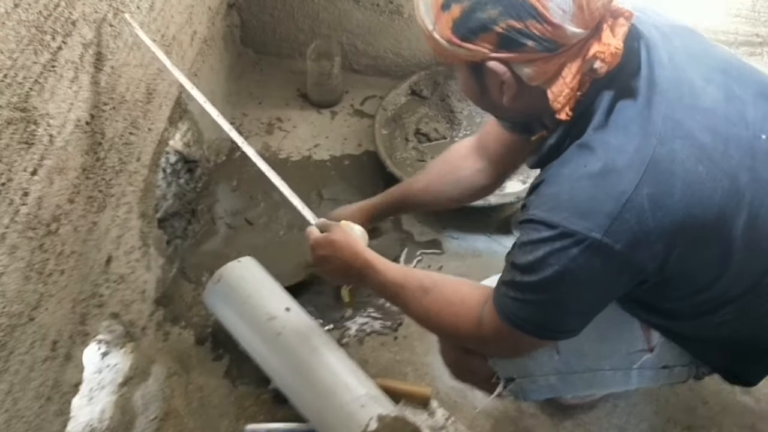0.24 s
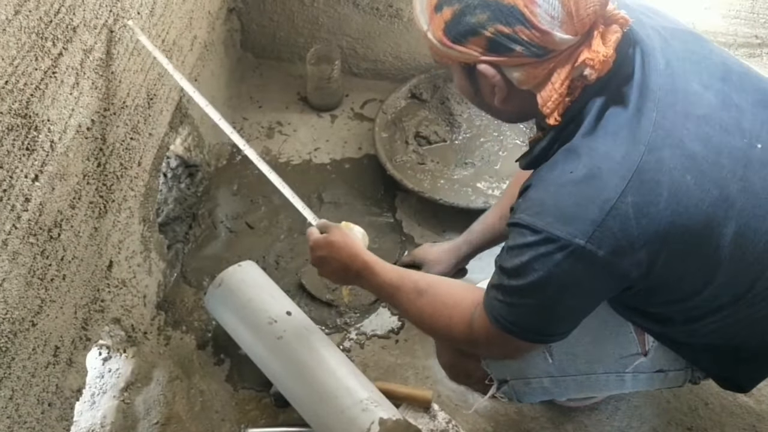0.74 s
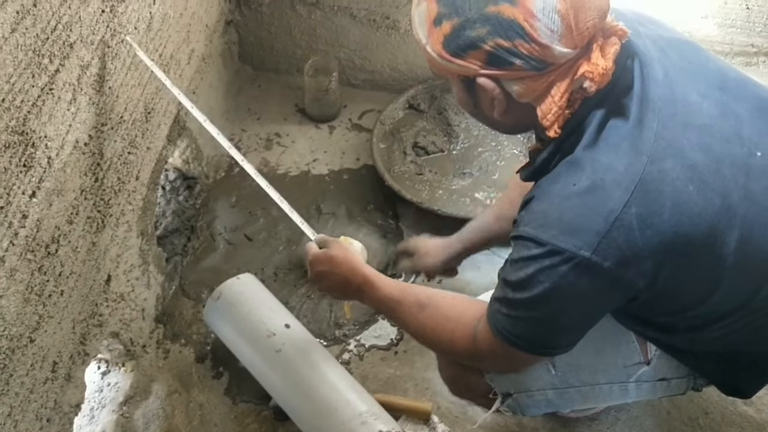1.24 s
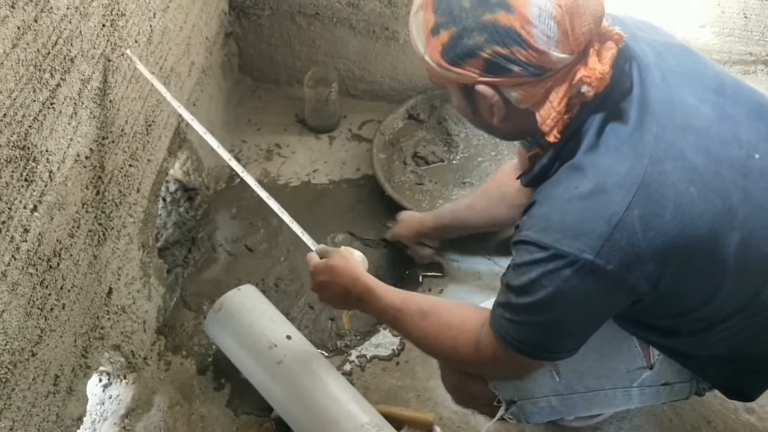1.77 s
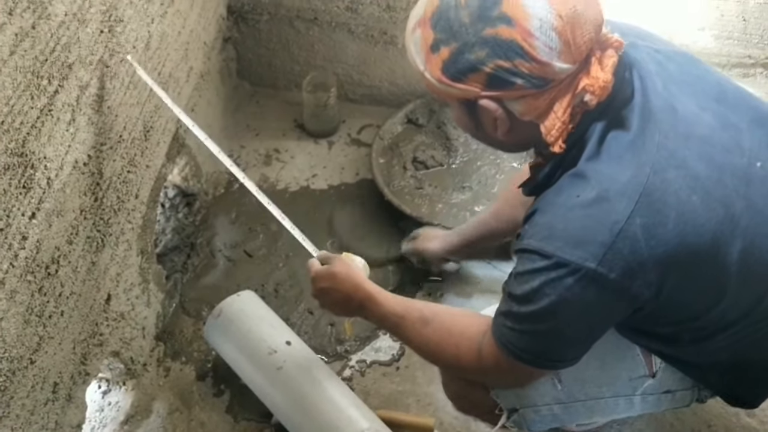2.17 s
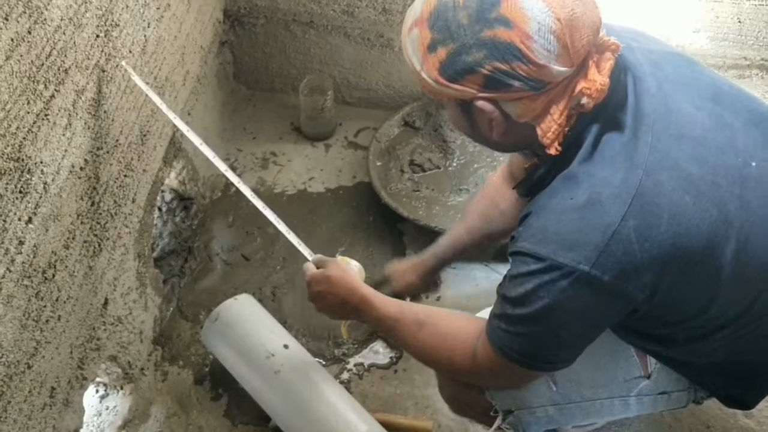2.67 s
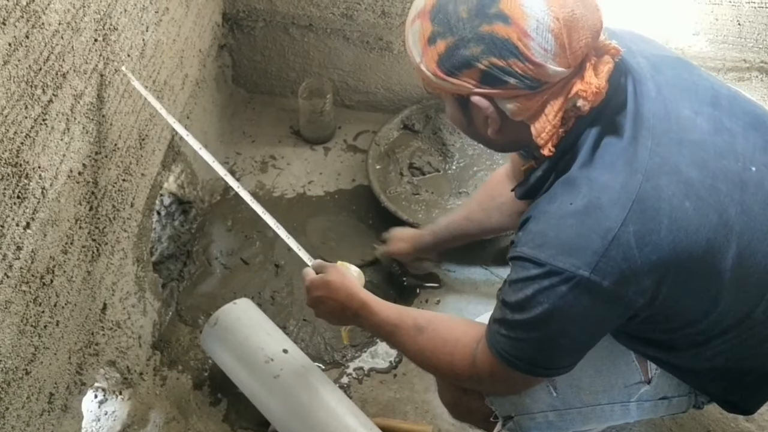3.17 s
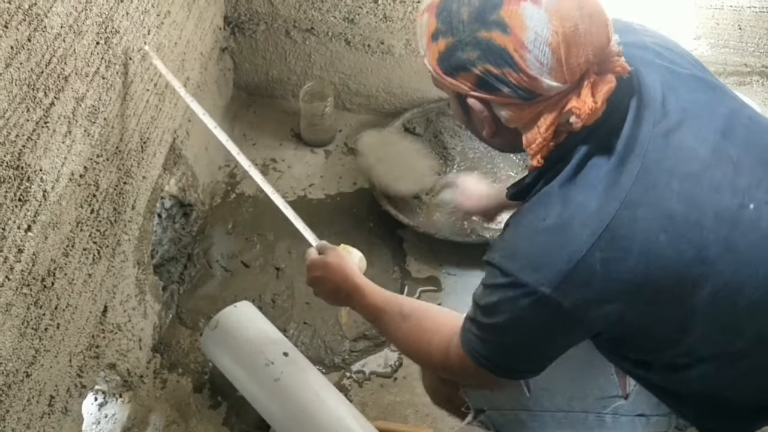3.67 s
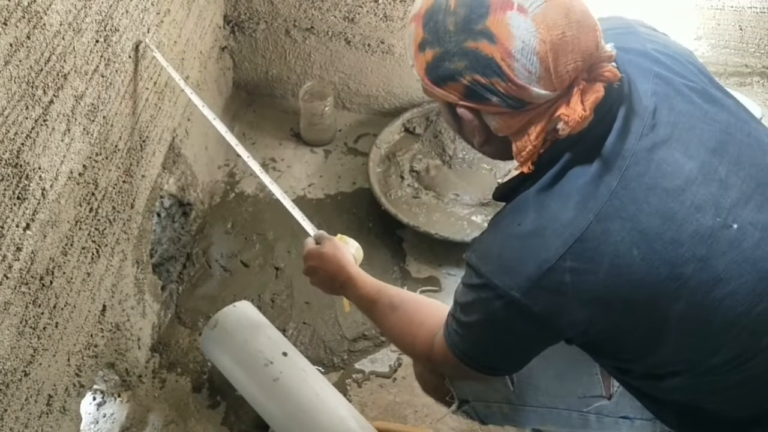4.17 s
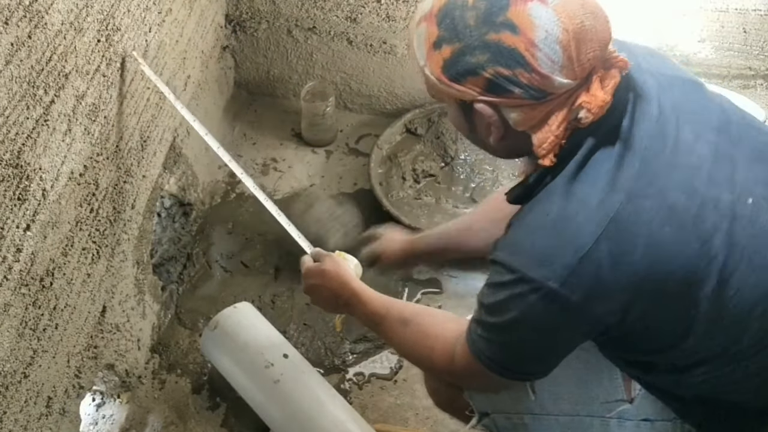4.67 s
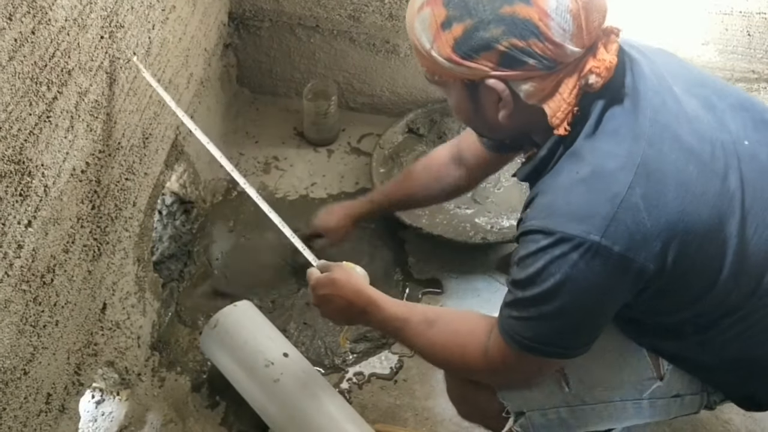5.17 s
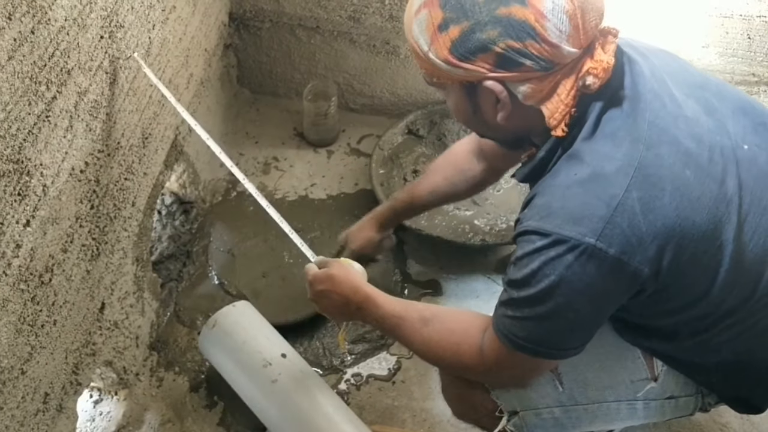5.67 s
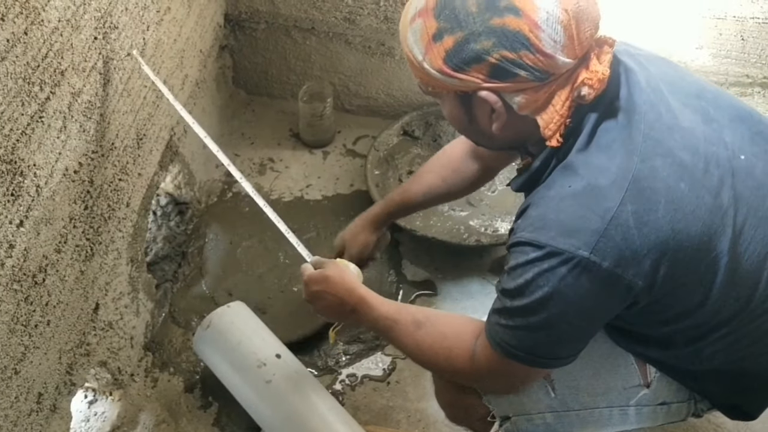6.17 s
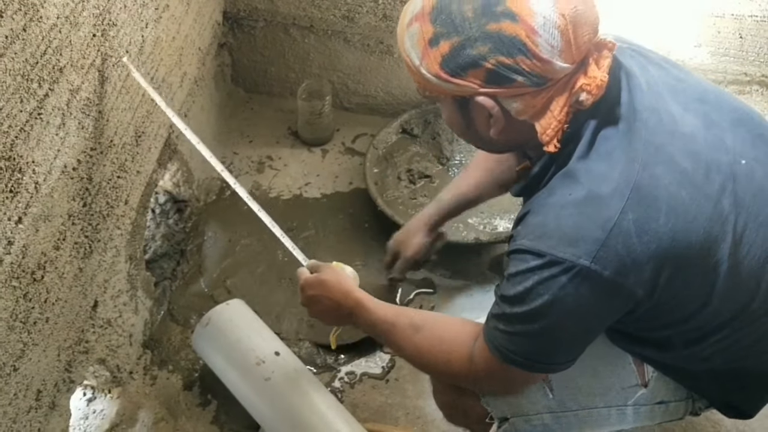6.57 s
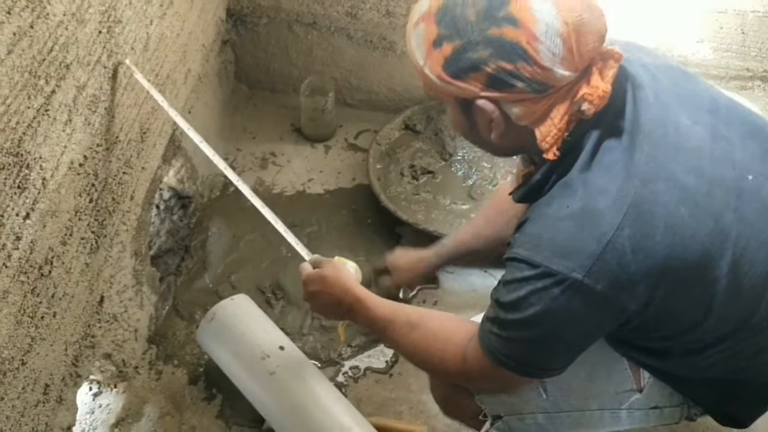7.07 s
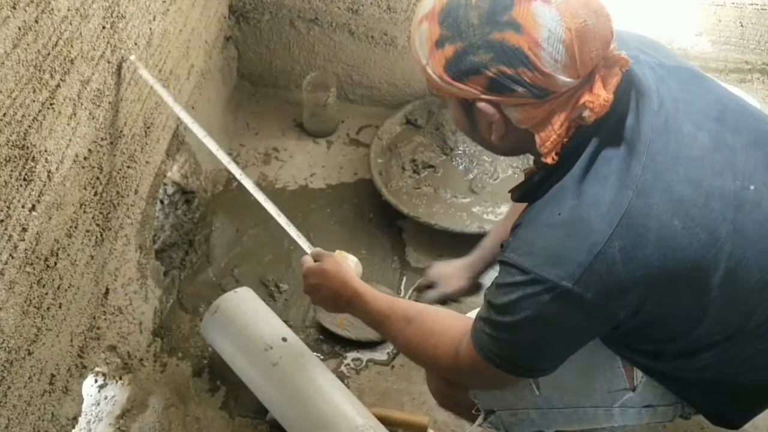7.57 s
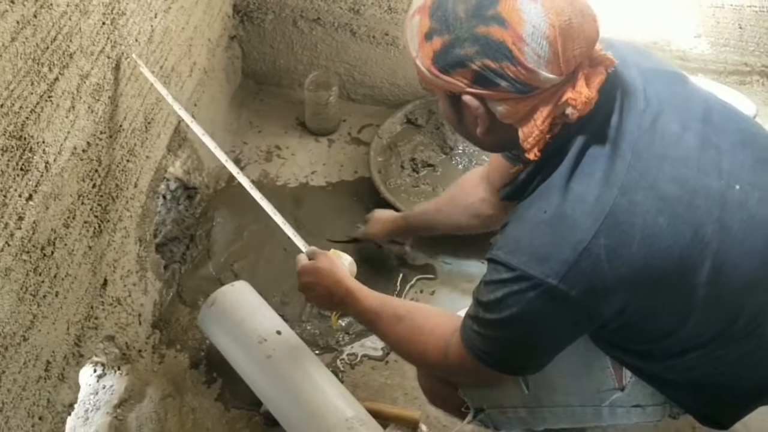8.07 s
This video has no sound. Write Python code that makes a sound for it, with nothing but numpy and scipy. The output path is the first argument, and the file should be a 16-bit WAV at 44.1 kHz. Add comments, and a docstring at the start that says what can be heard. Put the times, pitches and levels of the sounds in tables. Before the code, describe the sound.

A steel trowel scrapes and spreads wet gritty mortar in short irregular strokes, crunching and squelching, in a small bare room with faint low hum.

```python
"""A steel trowel spreads wet mortar over a concrete floor in short strokes, in the corner of a small bare room.
Shaped clicks make the sand grind, rasp and crunch, noisy resonances make air pockets squelch in the paste,
low noise thumps as mortar is shoved, and unsteady sines make the lifted blade ring. Close walls answer.
A low drone, strongest on the left, joins still air, a swelling rumble and a hum that throbs unevenly."""
import sys
import numpy as np
from scipy import signal
from scipy.fft import rfft, irfft, next_fast_len
from scipy.io import wavfile
from scipy.ndimage import map_coordinates

SR = 44100
rng = np.random.default_rng(int(sys.argv[2]) if len(sys.argv) > 2 else 0)


def transcribe(signal):
    """Save signal, clipped to [-1, 1], as a 16-bit WAV file at the path in sys.argv[1]."""
    frames = np.atleast_2d(signal).T
    limited = np.clip(frames, -1, 1)
    pcm = np.round(limited * 32767).astype(np.int16)
    wavfile.write(sys.argv[1], SR, pcm)


N = 367231

# All levels in the tables are relative: the mix, the room and the stereo balance act on them later.
# Pushes of the trowel: [start t/s, length t/s, time to take hold t/s,
# sand grinding level/dB, blade face rasp level/dB, thick paste smear level/dB]
PUSHES = [(0.0, 0.039, 0.002, -53.5, -48, -52.5), (0.076, 0.099, 0.01, -91, -65.5, -73),
          (0.379, 0.022, 0.0023, -40, -33.5, -38), (0.396, 0.2, 0.0024, -40.5, -37.5, -44.5),
          (0.525, 0.039, 0, -49.5, -34.5, -36), (0.831, 0.14, 0.015, -53, -73, -78.0),
          (0.947, 0.17, 0.002, -60.5, -69, -75), (1.166, 0.027, 0.00082, -65.5, -92, -79.5),
          (1.429, 0.02, 0.012, -32, -44, -73.5), (1.487, 0.13, 0.002, -47.5, -47.5, -80),
          (1.616, 0.43, 0.0073, -44.5, -41.5, -45.5), (2.145, 0.034, 0.027, -45, -43, -52.5),
          (2.243, 0.18, 0.0088, -44.5, -51.5, -67), (2.465, 0.004, 0.002, -45.5, -57.5, -74),
          (2.634, 0.11, 0.0025, -44.0, -49.5, -75), (2.667, 0.013, 0.001, -34.0, -45, -48.5),
          (2.761, 0.069, 0.0057, -40, -36, -44.5), (2.972, 0.19, 0.0018, -39.5, -40.5, -55),
          (3.171, 0.16, 0.00064, -42.5, -41.5, -53), (3.387, 0.101, 0.002, -44, -45.5, -62),
          (3.914, 0.057, 0.018, -51.5, -67.5, -82), (3.967, 0.05, 0.0022, -43.0, -61, -81),
          (4.016, 0.095, 0.0013, -50.5, -47.5, -65), (4.133, 0.11, 0.001, -53, -61, -71),
          (4.45, 0.067, 0.002, -62, -80, -71), (4.577, 0.044, 0.004, -50.5, -54.5, -62.5),
          (4.792, 0.073, 0.026, -52.5, -57.5, -62.5), (5.181, 0.055, 0.0093, -46, -42, -45),
          (5.25, 0.079, 0.011, -51.0, -57, -52.5), (5.362, 0.029, 0.021, -43, -39, -44.5),
          (5.502, 0.092, 0.014, -48, -48.5, -77), (5.586, 0.044, 0.013, -45.5, -38.5, -38),
          (5.648, 0.091, 0.006, -49.5, -48.5, -48.5), (5.86, 0.072, 0.002, -84, -61, -58.5),
          (5.99, 0.22, 0.015, -45, -42, -51.5), (6.042, 0.019, 0.011, -51, -53, -43),
          (6.398, 0.09, 0.012, -54.5, -60, -62.5), (6.454, 0.097, 0.00067, -46, -44.5, -73),
          (6.596, 0.085, 0.0037, -48.0, -44.5, -50.5), (6.983, 0.046, 0.0052, -68, -63, -83.5),
          (7.045, 0.11, 0.012, -47.5, -46.5, -56), (7.171, 0.087, 0.002, -55, -52.5, -63),
          (7.34, 0.084, 0.025, -42, -35, -51), (7.451, 0.068, 0.018, -51, -52.5, -76),
          (7.874, 0.38, 0.011, -47, -45.5, -65), (8.076, 0.063, 0.007, -51, -44, -46),
          (8.191, 0.098, 0.046, -40, -35, -41)]
# Lag of edge, face and paste behind a push, one row each:
# [extra rise t/s, easing during the push rate/(dB/s), added release rate/(dB/s)]
CONTACT = [(.001, 14.5, 310.5), (.005, 10.5, 310), (.013, 12.5, 295)]
# Colours of the scraping, for sand, its fizz, the blade's face and the paste: [f/Hz, level/dB]
SAND = [(2500, -39), (3700, -11.5), (4500, -4.5), (5300, 1.5), (6200, -4.5), (7200, -11.5), (8700, -19.5),
        (12000, -26), (15500, -23)]
FIZZ = [(4500, -17.5), (7000, -6.5), (9000, 2.5), (12000, 2), (15500, 7)]
FACE = [(900, -42.5), (1400, -6), (1800, 1), (2400, 0), (3200, -1.5), (4000, -11), (5500, -34.5)]
PASTE = [(250, -37), (500, -15.5), (700, -9.5), (900, -4), (1200, 4.5), (1450, 1), (2000, -37)]
# Reverberation of the bare walls: [f/Hz, time for 60 dB of decay t/s]
WALLS = [(200, 0.3), (1000, 0.23), (3000, 0.18), (7000, 0.16), (15000, 0.22)]
# Stereo lean of the trowel: [f/Hz, left minus right level/dB]
LEAN = [(300, -3), (1000, 2.5), (2000, 1.5), (5000, 4.5), (9000, 5), (13000, 0)]
# Colour of the still air: [f/Hz, level/dB]
AIR = [(12, -27), (24, -2), (60, -12.5), (200, -12.5), (320, -8), (480, -18.5), (650, -19.5), (900, -26.5),
       (1500, -30.5), (2500, -33), (4000, -44), (5500, -37.5), (8000, -46), (13000, -52.5)]
# Likeness of the air noise at left and right: [f/Hz, correlation/1]
ALIKE = [(30, 1), (120, 0.68), (300, 1), (700, 0.26), (3000, 0.068)]
# Swells of the low rumble: [t/s, level/dB]
RUMBLE_SWELL = [(0.0, -74), (0.76, -84), (1.9, -55.5), (2.87, -64.5), (3.29, -56), (3.99, -64.5),
                (4.34, -71.5), (5.52, -88), (5.84, -61.5), (7.84, -93), (8.14, -56), (8.33, -59)]
# Tones of the throbbing hum: [f/Hz, nominal width f/Hz, level/dB]
HUM = [(288.5, 22, 1), (315.7, 60, -6.5)]
# Strongest swells of the hum: [start t/s, length t/s, level/dB]
HUM_SWELLS = [(1.005, 0.142, -57), (1.87, 0.03, -57), (1.95, 0.048, -55.5), (2.196, 0.13, -54),
              (2.549, 0.063, -56.5), (3.13, 0.066, -55), (3.383, 0.2, -55.5), (4.137, 0.098, -54.5),
              (5.612, 0.081, -54.5), (6.12, 0.032, -57), (6.464, 0.06, -54), (6.686, 0.084, -58.5),
              (7.334, 0.029, -56.5), (7.824, 0.14, -56), (8.161, 0.058, -52.5)]
# Low resonances of the room: [f/Hz, nominal width f/Hz, level/dB]
BOOM = [(36, 8, -72.5), (105.5, 10, -73), (156.4, 11, -72.5)]
# Bites of the blade's edge into sand: [t/s, level/dB]
BITES = [(0.3894, -39), (0.5404, -17), (0.9527, -36.5), (1.077, -37.5), (1.4495, -21), (1.4716, -17),
         (1.675, -24), (2.2563, -30.5), (2.483, -39.5), (2.6743, -33), (2.824, -19.5), (2.9801, -19.5),
         (3.0975, -17), (3.3148, -21.5), (3.4047, -26.5), (4.6, -34), (5.3874, -42), (5.624, -30),
         (6.066, -34), (6.0874, -21.5), (6.464, -24.5), (7.4066, -27), (7.8833, -31), (8.27, -26)]
# Large air pockets under the blade: [10 ms after the swell peaks t/s, f/Hz, fade t/s, level/dB]
POCKETS = [(0.412, 1192, 0.027, -39), (0.42, 1693, 0.034, -38.5), (0.56, 947.0, 0.051, -41.5),
           (0.97, 1780, 0.052, -57), (1.1, 2010, 0.034, -49), (1.479, 1672, 0.046, -45.5),
           (1.7, 924, 0.021, -45.5), (1.88, 823, 0.019, -43.5), (2.03, 2115, 0.025, -49),
           (2.189, 1594, 0.027, -49.5), (2.198, 1174, 0.02, -47), (2.8, 1924.0, 0.028, -35.5),
           (3.0, 2192.0, 0.02, -34), (3.02, 1140, 0.061, -53), (4.06, 1900, 0.035, -52.5),
           (4.09, 747, 0.025, -45), (4.839, 1236, 0.014, -48), (5.405, 810, 0.022, -38),
           (5.64, 632.0, 0.023, -50), (6.085, 1813, 0.025, -33), (6.094, 1176, 0.028, -38),
           (6.83, 600, 0.1, -63.5), (7.12, 1172, 0.028, -46.5), (7.17, 572, 0.054, -54.5),
           (7.259, 532, 0.035, -50.5), (7.44, 909, 0.048, -55), (8.13, 1860, 0.025, -42.5),
           (8.23, 2274, 0.032, -34.5), (8.249, 1326, 0.027, -38)]
# Shoves of mortar: [start t/s, length t/s, level/dB]
THUMPS = [(1.507, 0.33, -44.5), (1.717, 0.47, -54.5), (2.17, 0.21, -54.5), (3.055, 0.2, -60.5),
          (5.68, 0.13, -54.5)]
# Colour of the shoves: [f/Hz, level/dB]
SHOVE = [(40, -23), (75, -9.5), (100, -1), (125, -4), (160, -7), (230, -16.5), (450, -49.5), (1200, -71.5)]
# Rings of the lifted blade: [start t/s, end t/s, f/Hz, rate of phase wander f/Hz, level at the end/dB]
RINGS = [(4.8, 4.988, 3120, 198, -65.5), (5.021, 5.187, 3075, 232, -66), (5.036, 5.185, 3630, 250, -72.5),
         (7.153, 7.377, 2914, 50.3, -51.5), (7.155, 7.375, 3300, 110, -59), (7.588, 7.9, 3028, 91.6, -71.5)]

HUM_DB, THROB_DB, THROBS_PER_S = -68, 4.5, 8  # hum between swells: level, depth and pace of the uneven throb
RING_GROWTH = 11  # dB per s, towards the end of a ring
TOP_HZ = 15950  # upper band limit


def amp(db):
    """Logarithmic level: decibels to amplitude ratio."""
    return 10 ** (np.asarray(db) / 20)


def unit(x):
    """Normalisation: scales mean power to 1."""
    return x / np.sqrt(np.mean(x ** 2) + 1e-20)


def along(points, hz):
    """Logarithmic interpolation of (f/Hz, value) points over frequency."""
    f, v = np.transpose(points)
    return np.interp(np.log(hz + 1), np.log(f + 1), v)


def wobble(rate, size=N):
    """Band-limited fluctuation: a smooth curve through rate random knots a second."""
    knots = rng.standard_normal(int(size * rate / SR) + 4)
    return map_coordinates(knots, [np.arange(size) * rate / SR], mode="nearest")


def filtered(x, response):
    """Linear filtering: the spectrum of x times a response of frequency."""
    m = next_fast_len(N + SR // 4)
    spectrum = rfft(x, m) * response(np.fft.rfftfreq(m, 1 / SR))
    return irfft(spectrum, m)[..., :N]


def coloured(x, spectrum, size=1024):
    """Minimum phase: a causal filter of energy 1 with the given colour, from its folded cepstrum."""
    cepstrum = irfft(np.log(amp(along(spectrum, np.fft.rfftfreq(size, 1 / SR)))))
    cepstrum[1:size // 2] *= 2
    cepstrum[size // 2 + 1:] = 0
    kernel = irfft(np.exp(rfft(cepstrum)))
    return signal.oaconvolve(x, kernel / np.linalg.norm(kernel))[:len(x)]


def add(track, s, sound):
    """Superposition: adds a sound to the track at s seconds."""
    start = max(round(s * SR), 0)
    remaining = track[..., start:start + sound.shape[-1]]
    remaining += sound[..., :remaining.shape[-1]]


def grains(rate, spread_db, clump_db):
    """Random impulses: sand grains crack in clumps, a few of them large; rms 1."""
    cracks = (rng.random(N) < rate / SR) * rng.choice([-1, 1], N)
    sizes = amp(spread_db * np.minimum(rng.standard_normal(N), 2.5))
    clumps = amp(clump_db * wobble(170))
    return unit(cracks * sizes * clumps)


def stroke_gains(press_db, press_rate):
    """Contact dynamics: each push takes hold, eases off and lets go, under an unsteady hand."""
    power = np.zeros((3, N))  # grinding, rasp, smear
    rise, easing, release = np.transpose(CONTACT)[:, :, None]
    for s, length, hold, *levels in PUSHES:
        t = np.arange(int(length * SR) + SR // 4) / SR
        db = np.array(levels)[:, None] - easing * t - release * np.maximum(t - length, 0)
        onset = np.minimum(t / (rise + hold), 1)
        add(power, s, (onset * amp(db)) ** 2)
    return np.sqrt(power) * amp(press_db * wobble(press_rate))


def cavities(x, depth_db, width_hz, life, size=512):
    """Cavity resonance: small gaps under the blade open and close at random pitches, for about life seconds."""
    z = signal.stft(x, nperseg=size, noverlap=size * 3 // 4)[2]
    bins, frames = np.indices(z.shape)
    place = [bins * SR / size / width_hz, frames * size / 4 / SR / life]
    field = map_coordinates(rng.standard_normal((256, 1024)), place, mode="wrap")
    gain = unit(amp(depth_db * np.minimum(field, 2)))
    return signal.istft(z * gain, nperseg=size, noverlap=size * 3 // 4)[1][:N]


def scraping(muffling, crushing):
    """Granular friction: the blade sticks and slips over sand; thicker paste under it sounds deeper."""
    pressed = stroke_gains(press_db=0.14, press_rate=27)
    sand, face, paste = pressed * amp(0.5 * wobble(45))
    cracks = sand * grains(rate=2800, spread_db=4.5, clump_db=2.0)
    # a blade laid flat smothers the fizz; a light touch keeps more of it than a hard push
    edge_share = sand / (sand + face + 1e-9)
    lightness = (sand / amp(-45) + .05) ** -crushing
    bare = edge_share ** muffling * lightness
    grinding = coloured(cracks, SAND) + amp(-9.5) * coloured(cracks * bare, FIZZ)
    rasp = coloured(face * grains(rate=1500, spread_db=4.5, clump_db=1.0), FACE)
    smear = coloured(paste * grains(rate=1200, spread_db=1.5, clump_db=5.0), PASTE)
    deep = amp(-1.5) * rasp + amp(-2.0) * smear
    hollow = cavities(deep, depth_db=3.7, width_hz=170, life=.035)
    return hollow + cavities(grinding, depth_db=3.2, width_hz=190, life=.035)


def room(x, wet_db, early, size=2048):
    """Reverberation: close walls answer at once, then a short tail; the pattern changes as the trowel moves."""
    out = np.zeros((2, N + size))
    padded = np.pad(x, (size, 2 * size))
    hz, t, z = signal.stft(np.zeros(SR // 4), SR, nperseg=256)
    dying = amp(-60 * t / along(WALLS, hz)[:, None]) * (1 + early * np.exp(-t / 0.0053))
    for start in range(0, N + size, size):
        # every overlapping block draws a new random reflection pattern for each ear
        phases = np.exp(2j * np.pi * rng.random((2, *z.shape)))
        tail = signal.istft(dying * phases, SR, nperseg=256)[1]
        answer = amp(wet_db) * tail / np.linalg.norm(tail, axis=1, keepdims=True)
        answer[:, 0] += 1  # the direct sound
        piece = padded[start:start + 2 * size] * np.sqrt(np.hanning(2 * size))
        heard = signal.fftconvolve(piece[None], answer, axes=1)
        add(out, start / SR, heard / np.hypot(1, amp(wet_db)))
    return out[:, size:]


def murmurs(bands):
    """Narrow-band noise: a sum of tones wavering in amplitude and phase."""
    t = np.arange(N) / SR
    total = np.zeros(N)
    for hz, width, db in bands:
        waver = wobble(2 * width) + 1j * wobble(2 * width)
        total += amp(db) * unit(np.real(waver * np.exp(2j * np.pi * hz * t)))
    return total


def throbbing(fade, swell_db):
    """Amplitude modulation: an uneven throb of the hum with stronger swells on top."""
    gain = amp(HUM_DB + THROB_DB * wobble(THROBS_PER_S))
    for s, length, db in HUM_SWELLS:
        swell = np.hanning(int((length + 2 * fade) * SR))
        add(gain, s - fade, amp(db + swell_db) * swell)
    return gain


def drone():
    """Stationary noise and modulated tones: still air, swelling rumble, throbbing hum and room resonances."""
    t = np.arange(N) / SR

    def mid_side(hz):
        """Partial coherence: splits the air's colour into mid and side by left-right likeness."""
        turn = np.arccos(np.clip(along(ALIKE, hz), -1, 1)) / 2
        return amp(along(AIR, hz)) * [np.cos(turn), np.sin(turn)]

    mid, side = filtered(rng.standard_normal((2, N)), mid_side)
    air = amp(-62.5) * unit(np.array([mid + side, mid - side]))
    rumble_colour = [(12, -19), (30, -6), (130, -5.0), (260, -26.0), (700, -84)]  # f/Hz, level/dB
    rumble_gain = amp(np.interp(t, *np.transpose(RUMBLE_SWELL)) - 4.5)
    rumble = rumble_gain * coloured(rng.standard_normal(N), rumble_colour)
    hum = throbbing(fade=0.039, swell_db=-0.9) * murmurs(HUM)
    # gains in dB: left, right
    low = (air + rumble) * amp([[1.5], [-1.5]])
    return low + hum * amp([[3.5], [-8]]) + murmurs(BOOM) * amp([[2.5], [-2]])


def bites(rise, fall):
    """Brittle fracture: the edge crushes a cluster of grains in a short bright crunch."""
    force, t = np.zeros(N), np.arange(SR // 8) / SR
    for s, db in BITES:
        add(force, s - rise, amp(db) * (1 - np.exp(-t / rise)) * np.exp(-t / fall))
    crunch = force * grains(rate=4500, spread_db=2.5, clump_db=1)
    return amp(-10.0) * coloured(crunch, SAND) + amp(-15.0) * coloured(crunch, FACE)


def squelches(rise_share, sag, width, upper_db):
    """Bubble resonance: each air pocket opens fast, rough and with a weak upper mode, and drifts in pitch."""
    out, t = np.zeros(N), np.arange(-SR // 16, SR // 8) / SR
    for s, hz, fade, db in POCKETS:
        swell = np.exp(-(t / np.where(t < 0, rise_share * fade, fade)) ** 2)
        # the pitch usually falls as the paste parts
        pitch = hz * (1 - sag * rng.normal(1, 0.542) * t)
        phase = 2 * np.pi * np.cumsum(pitch) / SR
        rough = lambda: wobble(width * hz, len(t)) + 1j * wobble(width * hz, len(t))
        main = rough() * np.exp(1j * phase)
        upper = amp(upper_db) * rough() * np.exp(2.3j * phase)
        pocket = unit(swell * np.real(main + upper))
        add(out, s + t[0] - .01, amp(db) * pocket * np.sqrt(np.mean(swell ** 2)))
    return out


def thumps():
    """Impact on a damped mass: mortar is shoved against the floor in low bursts of noise."""
    push = np.zeros(N)
    for s, length, db in THUMPS:
        add(push, s, amp(db) * np.hanning(int(length * SR)))
    return coloured(push * rng.standard_normal(N), SHOVE)


def blade(flutter_db):
    """Plate vibration: the free steel rings thinly and unsteadily until it touches the mortar again."""
    out = np.zeros(N)
    for start, end, hz, breadth, db in RINGS:
        t = np.arange(int((end - start) * SR)) / SR
        tone = np.sin(2 * np.pi * hz * t + .85 * wobble(breadth, len(t)))
        level = db + RING_GROWTH * (t - t[-1]) + flutter_db * wobble(43.4, len(t))
        add(out, start, amp(level) * signal.windows.tukey(len(t), .3) * tone)
    return out


def scene():
    """Superposition in a room: the trowel works a little left of centre, heard mostly off the walls."""
    trowel = scraping(muffling=1.15, crushing=0.45)
    trowel += bites(rise=0.0032, fall=0.012)  # s
    trowel += blade(flutter_db=2.5)
    trowel += squelches(rise_share=.45, sag=.9, width=0.1098, upper_db=-15.5)
    heard = room(trowel, wet_db=12, early=2.5)
    heard = filtered(heard, lambda hz: amp(1.51 + np.outer([.5, -.5], along(LEAN, hz))))
    # a second, independent set in opposite polarity left and right widens the thumps
    shoves = thumps() * amp([[1.5], [-5]]) + amp(-9.5) * thumps() * [[1], [-1]]
    return heard + shoves + drone()


def record(dry):
    """Band limitation: a very steep low-pass at TOP_HZ."""
    return filtered(dry, lambda hz: 1 / np.sqrt(1 + (hz / TOP_HZ) ** 240))


dry = scene()
out = record(dry)
transcribe(out)
```